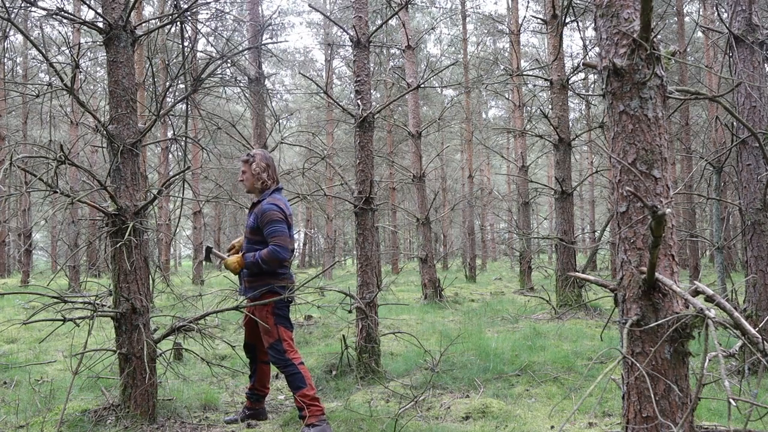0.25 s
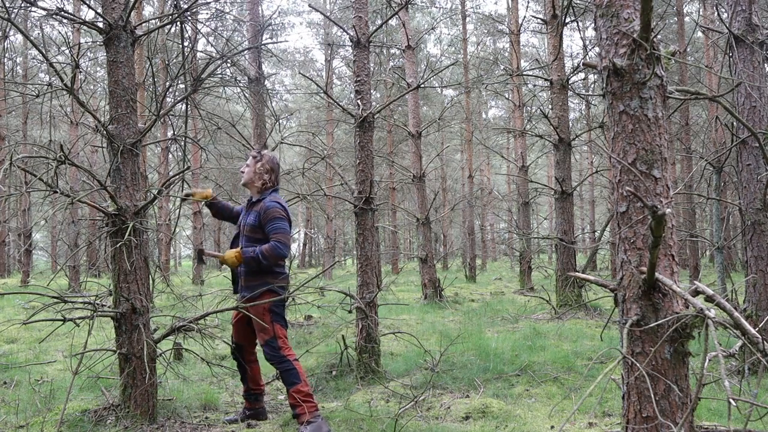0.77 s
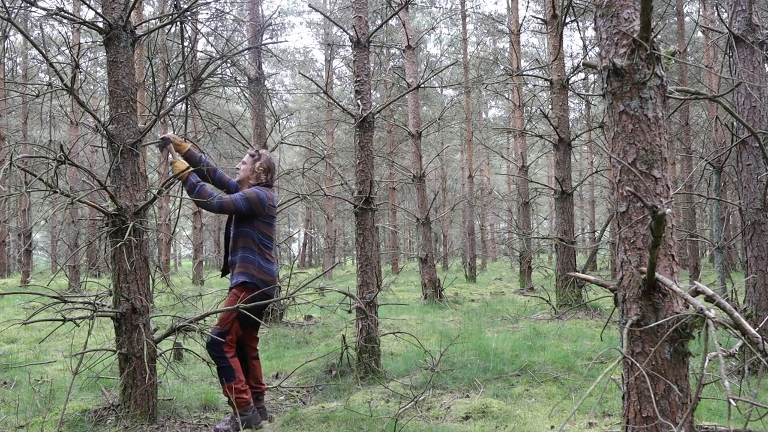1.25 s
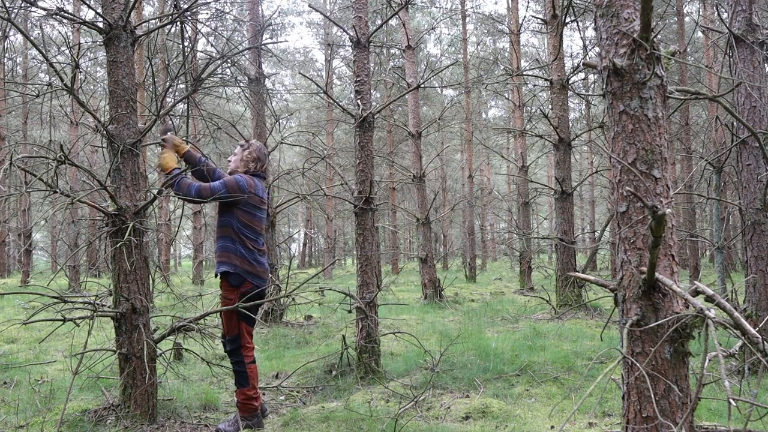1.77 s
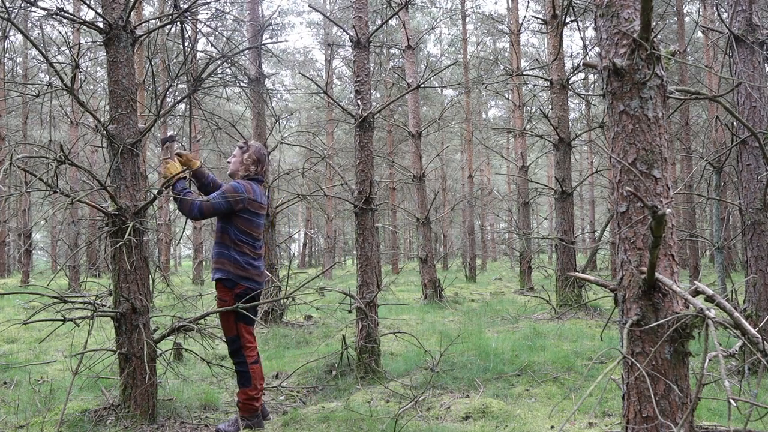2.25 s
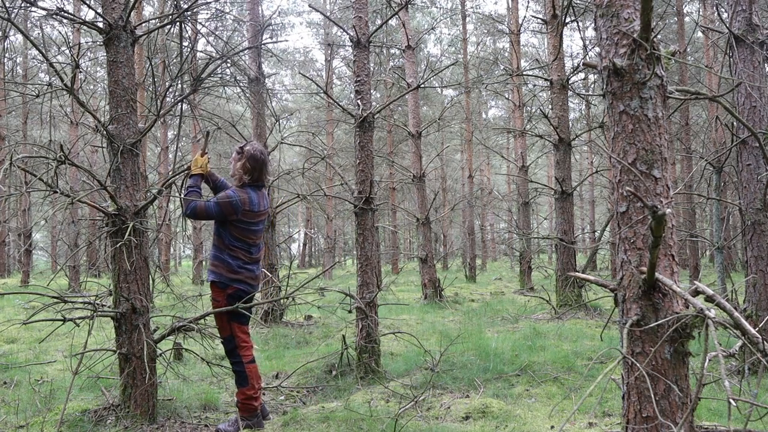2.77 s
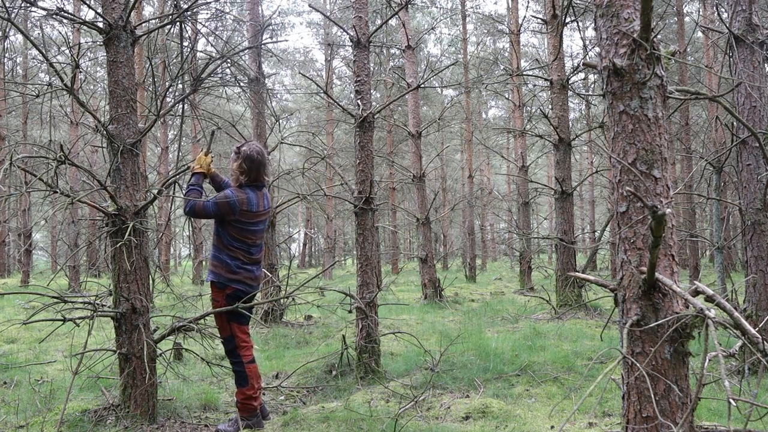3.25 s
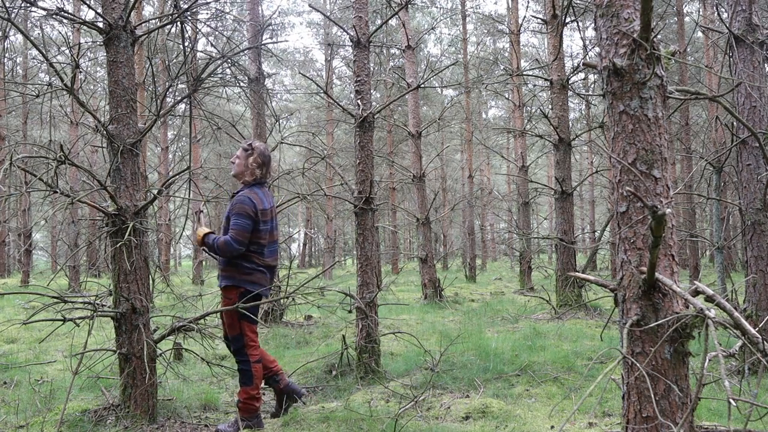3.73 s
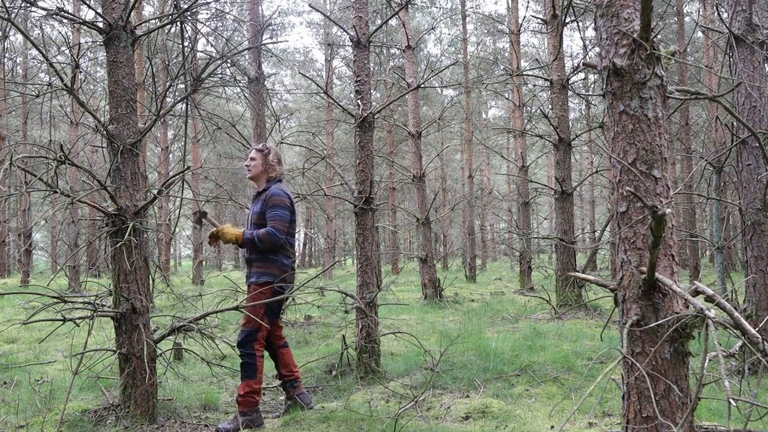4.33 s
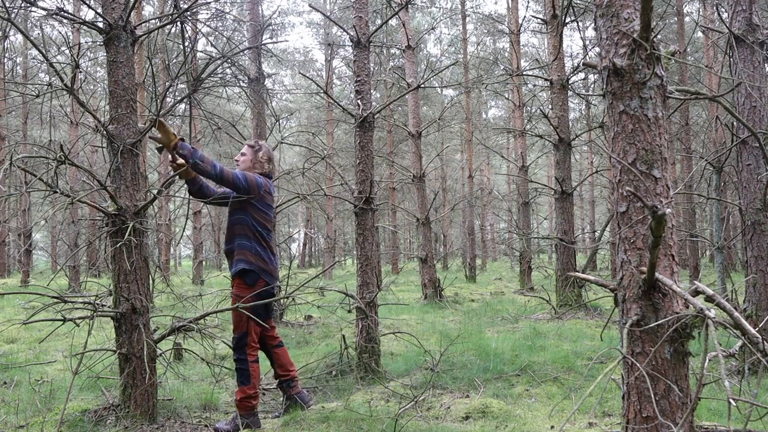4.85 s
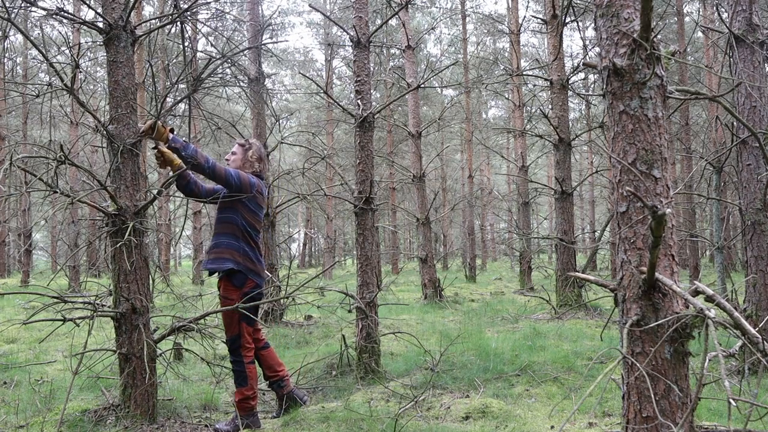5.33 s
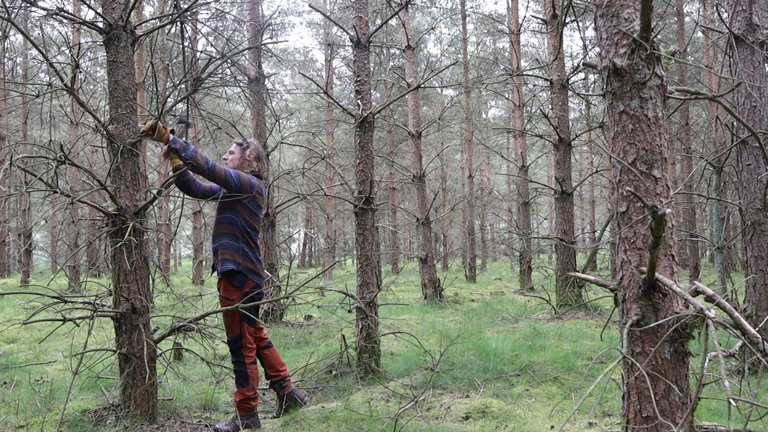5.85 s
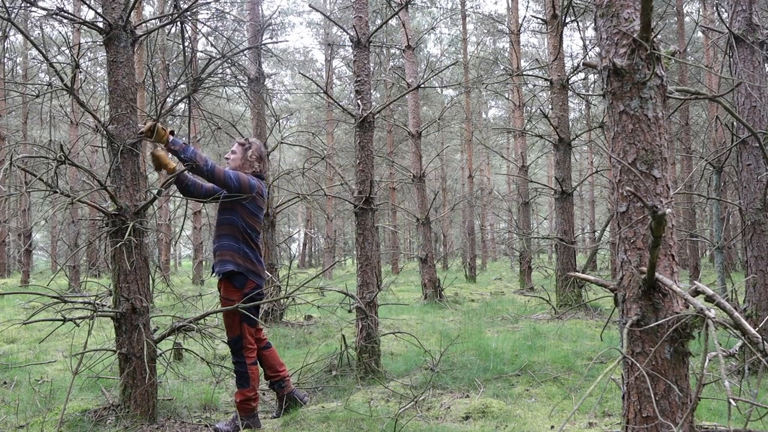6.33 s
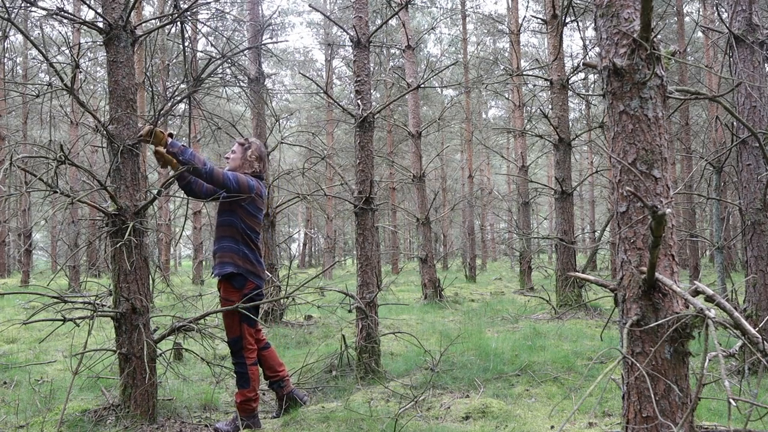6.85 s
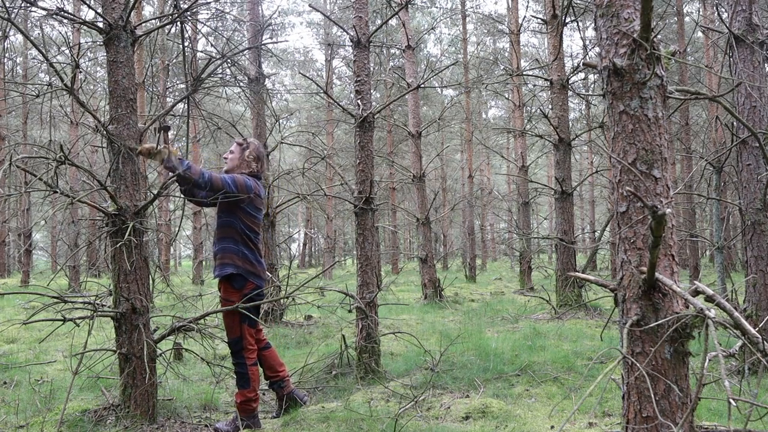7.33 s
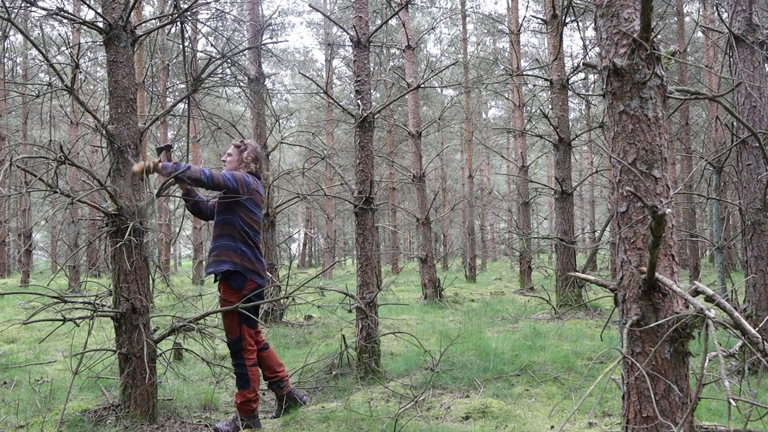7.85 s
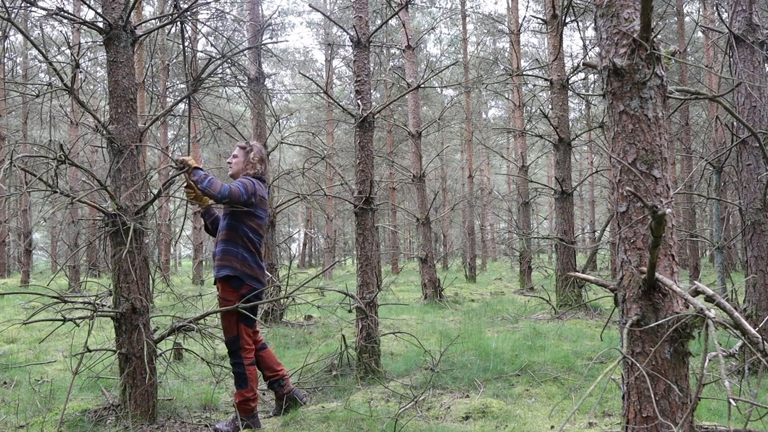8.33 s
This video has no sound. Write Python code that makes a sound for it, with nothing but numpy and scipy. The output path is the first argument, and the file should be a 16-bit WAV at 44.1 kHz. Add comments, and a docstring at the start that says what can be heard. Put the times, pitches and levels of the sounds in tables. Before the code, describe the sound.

Sharp brittle branch cracks, some with woody trunk knocks, amid clothing and bark rustle, low far-off traffic rumble and a few faint bird whistles.

```python
"""In a plantation, gloved hands snap dead pine twigs off a trunk: each crack is a burst of noise ringing dry wood.
Hard pulls jolt the trunk, whose decaying modes knock and boom; the trunks around answer each crack with a hiss.
Boots, sleeves and bark crackle as crowds of tiny damped clicks, and a small bird whistles in gliding sines.
A far road drones: filtered noise for tyres, harmonics for an engine that wavers and then sinks, one steadier hum.
Low wind rumbles, and the microphone clips the loudest cracks."""
import sys
import numpy as np
from scipy import signal
from scipy.fft import rfft, irfft, next_fast_len
from scipy.io import wavfile
from scipy.ndimage import uniform_filter1d, map_coordinates

SR = 44100
rng = np.random.default_rng(int(sys.argv[2]) if len(sys.argv) > 2 else 0)


def to_wav(s):
    """Save 16-bit WAV."""
    ch = np.atleast_2d(s).T  # columns
    pcm = np.round(np.clip(ch, -1, 1) * 32767)  # PCM
    wavfile.write(sys.argv[1], SR, pcm.astype(np.int16))


N = 378819  # length in samples

# Spectrum of the tyre roar: f/Hz, level/dB
ROAD_SPECTRUM = [(12, -31), (20, 0), (81, -1.5), (127, -4), (204, -9.5), (399, -5.5), (759, -2.5),
                 (1960, -19.5), (3250, -25.5), (4180, -26.5), (8180, -32.5), (14700, -28), (16000, -29)]
# Course of the tyre roar: t/s, level/dB
ROAD_COURSE = [(0, -48), (1.5, -47), (2.1, -48.5), (3.4, -47.5), (6.2, -50), (8.59, -49.5)]
# Engine: t/s, shaft f/Hz, level/dB, load/dB
ENGINE_COURSE = [(0, 26.3, -69, 17.5), (.6, 28, -68, 2.5), (1.4, 26, -61.5, 0), (2.2, 31.4, -62, -1),
                 (3, 25.3, -60.5, -15), (3.65, 31, -66, 1), (3.8, 29, -57.5, 8), (4.1, 28.7, -60.5, 13.5),
                 (5, 27, -59.5, 5), (5.5, 24.5, -64, 11.5), (6.3, 21.3, -55.5, 4), (7, 21.3, -59.5, -2),
                 (7.5, 22, -59.5, 4), (8.59, 18, -78, 11)]
# Orders of the shaft, one row for each multiple below: level/dB, share of the load that lifts it/1
ENGINE_ORDERS = [(-4, .2), (-0.4, 0.96), (.1, .05)]
SHAFT_MULTIPLES = 2, 3, 5
# A second, steadier drone: t/s, f/Hz, level/dB
HUM_COURSE = [(0, 122.1, -63), (.8, 117.6, -59), (1.6, 116.8, -56.5), (2.3, 114.9, -75), (3.2, 118.5, -73),
              (3.6, 121, -70)]
WIND_DB, GUST_DB = -65, 3  # mean level; depth of the gusts
# Whistles, one list for each call: t/s, f/Hz, level/dB
BIRD_CALLS = [
    [(.015, 4370, -70), (.055, 4430, -62), (.12, 4470, -66), (.26, 4460, -77)],
    [(4.185, 3750, -76), (4.22, 4150, -72), (4.26, 4420, -70), (4.32, 4530, -70), (4.41, 4510, -73)],
    [(6.53, 3400, -76), (6.56, 3600, -70), (6.585, 4100, -72), (6.61, 4200, -78)],
]

# Boots, sleeves and bark brushed: t of the peak/s, length/s, dull level/dB, crisp over dull level/dB
BRUSH_STROKES = [(.01, .03, -55, 1), (0.393, 0.037, -61, -1), (0.722, 0.15, -48, -0.5),
                 (0.924, 0.081, -54.5, -4), (1.066, 0.15, -65, 7), (1.292, 0.046, -43.5, -7),
                 (1.35, 0.057, -51.5, -8), (1.484, 0.13, -53.5, -5), (2.001, 0.22, -51.5, -24),
                 (2.246, 0.074, -56.5, -9), (2.465, 0.23, -58, -27), (2.66, 0.25, -57, -14),
                 (3.471, .15, -51, -10), (3.85, 0.19, -64, -15), (4.143, 0.074, -51.5, -4),
                 (4.5, 0.29, -59, -9), (4.827, 0.39, -65, -8), (5.13, 0.27, -64, -13),
                 (7.194, 0.22, -58.5, -13), (7.429, 0.1, -61, -3), (7.58, .3, -67, 4),
                 (7.84, 0.098, -49.5, -10), (7.96, .17, -46, -5), (8.165, 0.13, -50.5, -1.5),
                 (8.28, 0.23, -59.5, -16), (8.45, 0.21, -62.5, 1.5)]
EDGE_DB, RISE_SHARE = -7.5, 0.49  # level at either end of the length; share of the length spent rising
STIR_DB = -72.5, -69.5  # dull and crisp crackle between the brushes

# Pulls that shake the trunk: t/s, knock level/dB, boom level/dB, hollow ring level/dB
TRUNK_JOLTS = [(1.275, -35, -55, -40), (1.469, -29.5, -53, -33.5), (1.851, -31, -35, -26),
               (5.474, -31.5, -37.5, -36.5), (5.950, -26.5, -33, -29.5), (6.400, -27.5, -30, -33),
               (6.762, -36, -34, -53), (7.942, -48, -66, -37)]
# Modes of the knock: f/Hz, level/dB, time to the peak/s, t60/s
KNOCK_MODES = [(346, 2.5, 0.0052, 0.032), (214, -3.5, 0.0089, 0.075), (133.7, -2.5, 0.02, 0.03),
               (157.7, -11.5, 0.057, 0.048)]
# Modes of the boom: f/Hz, level/dB, time to the peak/s, t60/s
BOOM_MODES = [(68.7, -1, 0.095, 0.68), (54.6, -7.5, 0.092, 0.91)]
# Modes of the hollow ring: f/Hz, level/dB, time to the peak/s, t60/s
HOLLOW_MODES = [(636, -2, 0.01, 0.063), (451.5, -3.5, 0.0044, 0.082), (810, -1.5, 0.009, 0.017),
                (527, -5, 0.0029, 0.083), (268, -7.5, 0.0057, 0.1)]

# Decay of the sound scattered by the trunks: f/Hz, t60/s
FOREST_DECAY = [(500, 1), (2600, 0.33), (7000, 0.49), (15000, 0.092)]
ECHO_DB, ECHO_GROWS = -14.5, 0.061  # scattered over direct level for a 0 dB crack; dB more per dB of energy

# Breaks: t/s, energy level/dB, stub f/Hz, stub over 3 kHz ring level/dB, top over 3 kHz ring level/dB
TWIG_BREAKS = [(0.5467, -26.5, 1350, -5, -12), (0.6754, -18, 1630, 8, 14), (0.694, -17, 1320, -2, -1),
               (0.7074, -13.5, 1750, 10, 3), (0.7207, -13.5, 1280, 5, 9), (0.7366, -19, 1320, 0, 12),
               (0.8219, -20.5, 1160, 5, 5), (0.8778, -18, 2180, -11, 7), (0.8965, -20, 1590, 8, 3),
               (0.9518, -23, 1150, 2, -2), (1.2518, -16.5, 1380, -3, -6), (1.281, -14, 1490, -8, 10),
               (1.3447, -21, 1530, 9, 7), (1.47, -6.5, 2040, -4, -7.5), (1.5698, -7, 1430, 5, 0),
               (1.5906, -10, 1330, 1, -6), (1.7096, -4.5, 1870, 1, 1), (1.85, 4, 1640, -2, 2),
               (1.8502, 10.5, 2310, -7, -3.5), (1.868, -0.5, 1720, -5, -8), (2.2057, -22, 1710, -15, -2),
               (2.2736, -19, 1780, -9, -20), (2.41, -20, 1160, 6, 6), (2.7084, -21.5, 1237, -7, -11),
               (3.102, -26, 1150, -7, -22), (3.779, -30, 1370, -13, -19), (3.8327, -27, 1250, 10, 10),
               (3.9593, -17.5, 1840, -2, 0.5), (3.989, -26, 1910, 1, 6), (4.4215, -10, 1410, 5.5, 5),
               (4.4563, -19.5, 1200, 4, 21), (4.622, -25, 1140, 3, 6), (4.8656, -19, 1152, -3, -0.5),
               (5.1249, -16, 2280, -3.5, 2), (5.4748, -8, 1240, -7.5, -8.5), (5.9492, 7, 2202, -14.5, -12),
               (5.9506, 6.5, 1476, 5, 11), (6.3177, -29, 1260, 7, 6), (6.3983, 0, 1500, 4, 3.5),
               (6.4015, 3, 1310, 3.5, -3), (6.6852, -24.5, 1250, 6, -2), (6.7617, 9, 1434, -11.5, -9),
               (7.041, 0.5, 1430, -6.5, -7), (7.1203, -0.5, 1620, -2.5, 6.5), (7.1568, -21.5, 1360, -6, 7),
               (7.232, -3.5, 1820, -14, 8.5), (7.2491, -11, 1400, -6, 6.5), (7.53, -22.5, 1472, -13, -15),
               (7.5789, 2.5, 1997, -6, -0.5), (7.668, -18.5, 1550, -13, -10), (7.778, -23, 1700, -9, 2),
               (7.8021, -19, 1170, 1, -2), (7.8408, -11.5, 1460, 9, 10), (7.861, -13, 2220, -6, 0),
               (7.8674, -8.5, 1760, -15, -1), (7.9407, 1, 1460, -5, 1), (8.0195, -19, 1180, -4, -16),
               (8.1616, -17, 1250, 9, 8), (8.334, -14, 1487, 7, 13), (8.3421, -15, 1930, 4, 11),
               (8.3939, -18, 1740, -15, -3), (8.4765, -20, 1340, 5, 1)]
# Resonances of dry wood in the 3 kHz, 5 kHz and top groups: f/Hz, width/Hz (of each of two stages), level/dB
WOOD_GROUPS = [
    [(2410, 900, -5.5), (3113, 770, 6.5), (4110, 3500, -14)],
    [(5140, 2300, 0)],
    [(6700, 810, -16), (8930, 2800, 3.5), (10300, 2600, 4.5), (14500, 15000, 0)],
]
# Resonances of the piece left on the trunk: multiple of its pitch/1, width at STUB_LOSS_HZ/Hz, level/dB
STUB_MODES = [(1, 113, 6), (.7, 1350, -6), (1.35, 1060, -13)]
STUB_LOSS_HZ, STUB_LOSS_GROWS = 1420, 1.2  # widths grow as this power of the pitch over this reference in Hz
HOLD_S, HOLD_GROWS = .0017, .27  # tearing time in s at 0 dB energy; dB longer per dB stronger
DULL_HZ, DULL_FALLS = 12000, 0.15  # treble corner of a 0 dB crack; dB lower per dB of energy
FIVE_DB, FIVE_FOLLOWS, FIVE_GROWS = -3.5, .4, 0.28  # 5 kHz over 3 kHz ring; dB per dB of top, of energy
SPLINTER_S, SPLINTER_DB = .003, 5  # a break this soon after another is a thin splinter: stronger 5 kHz ring

# Microphone response: f/Hz, level/dB
MIC_RESPONSE = [(1000, 0.5), (3500, 0.5), (4250, -4.5), (5400, 0), (6300, -4.5), (7500, 0.5), (15000, -6.5)]
CLIP, KNEE = .54, 8  # full swing of the input; hardness of its corner
TOP_HZ = 16000  # upper band limit


def amp(db):
    """Level: an amplitude ratio is ten to the power dB/20."""
    return 10 ** (np.asarray(db) / 20)


def unit(x):
    """Normalization: a signal divided by its rms has rms 1."""
    return x / np.sqrt(np.mean(x ** 2) + 1e-20)


def along(points, hz):
    """Interpolation of (f, value) points on a logarithmic frequency axis."""
    f, v = np.transpose(points)
    return np.interp(np.log(hz + 1), np.log(f + 1), v)


def curves(rows):
    """Linear interpolation in time: one value per sample for each column after t."""
    s, *cols = np.transpose(rows)
    return [np.interp(np.arange(N) / SR, s, c) for c in cols]


def wobble(count):
    """Random fluctuation: a smooth curve, stepped every 64 samples, through random knots."""
    knots = rng.standard_normal(count + 1)
    places = np.linspace(0, count, N // 64 + 1)
    return map_coordinates(knots, [places]).repeat(64)[:N]


def filtered(x, response):
    """Linear filtering: the spectrum is multiplied by a response of frequency."""
    m = next_fast_len(len(x) + 8192)  # padded against wrap-around
    return irfft(rfft(x, m) * response(np.fft.rfftfreq(m, 1 / SR)), m)[:len(x)]


def resonance(f, hz, width_hz):
    """Simple resonator: a causal band-pass response with peak gain 1."""
    return 1j * f * width_hz / (hz * hz - f * f + 1j * f * width_hz)


def tone(rows):
    """Frequency modulation: a sine's phase integrates its frequency; it is silent outside its rows."""
    hz, db = curves(rows)
    t = np.arange(N) / SR
    sounding = (t > rows[0][0]) * (t < rows[-1][0])
    return amp(db) * np.sqrt(2) * np.sin(2 * np.pi * np.cumsum(hz) / SR) * sounding


def add(track, s, sound):
    """Superposition: a sound is added to the track from s seconds on."""
    part = track[round(s * SR):][:len(sound)]
    part += sound[:len(part)]


def wind():
    """Turbulence noise: low resonant noise whose level varies in gusts."""
    rumble = unit(filtered(rng.standard_normal(N), lambda f: resonance(f, 30.3, 25) ** 2))
    return amp(WIND_DB + GUST_DB * wobble(count=25)) * rumble


def tyre_roar():
    """Broadband rolling noise, its spectrum thinned by distance."""
    level_db, = curves(ROAD_COURSE)
    roar = unit(filtered(rng.standard_normal(N), lambda f: amp(along(ROAD_SPECTRUM, f))))
    return amp(level_db + 0.95 * wobble(count=30)) * roar


def engine():
    """Periodic excitation: orders at multiples of the shaft rate, wavering in level on the way."""
    shaft_hz, level_db, load_db = curves(ENGINE_COURSE)
    turn = 2 * np.pi * np.cumsum(shaft_hz) / SR
    out = np.zeros(N)
    for k, (order_db, load_share) in zip(SHAFT_MULTIPLES, ENGINE_ORDERS):
        gain = amp(level_db + order_db + load_share * load_db + wobble(count=30))
        out += gain * np.sqrt(2) * np.sin(k * turn)
    return out


def hum():
    """Amplitude modulation: one drone of slowly gliding pitch whose level wavers."""
    return tone(HUM_COURSE) * amp(2.5 * wobble(count=30))


def bird():
    """Multipath fading: thin far whistles flicker in level, blurred by many paths through the trees."""
    blur = 1 + .3 * wobble(count=1200)
    return sum(tone(call) for call in BIRD_CALLS) * amp(1.2 * wobble(count=350)) * blur


def crackle(hz, spread, count, spiky_db, hiss):
    """Granular noise: tiny damped clicks of scattered pitch and size over a fine hiss, rms 1."""
    draw = rng.random((count, 2))  # place and size of each click
    pitch = np.clip(hz * np.exp(spread * rng.standard_normal((count, 1))), 300, 15000)
    t = np.arange(64) / SR
    size = amp(-spiky_db * np.log(draw[:, 1:] + 0.0048))  # few large, many small
    grains = size * np.sin(2 * np.pi * pitch * t) * np.exp(-t * pitch / 2.5)
    at = (draw[:, :1] * N).astype(int) + np.arange(len(t))
    clicks = unit(np.bincount(at.ravel(), grains.ravel(), N + len(t))[:N])
    fine = unit(filtered(rng.standard_normal(N), lambda f: resonance(f, hz, 3.2 * spread * hz)))
    return unit(clicks + hiss * fine)


def rustle():
    """Frictional noise of needles, bark and cloth: brushes swell a crisp and a dull crackle that clump."""
    t = np.arange(0, N + 64, 64) / SR  # coarse time for the envelopes
    s, length, db, crisp_db = np.transpose(BRUSH_STROKES)[..., None]
    span = length * np.where(t < s, RISE_SHARE, 1 - RISE_SHARE)
    swell = amp(db + EDGE_DB * (np.abs(t - s) / span) ** 2.07)
    dull_stir, crisp_stir = amp(STIR_DB)
    now = np.arange(N) / SR
    dull_gain = np.interp(now, t, dull_stir + np.sum(swell, axis=0))
    crisp_gain = np.interp(now, t, crisp_stir + np.sum(swell * amp(crisp_db), axis=0))
    clumps_db = 2.5 * wobble(count=500)
    crisp = crackle(8200, 0.51, count=9000, spiky_db=5.5, hiss=0.73)
    dull = crackle(2680, 0.45, count=5000, spiky_db=3.5, hiss=0.82)
    return amp(clumps_db) * (crisp_gain * crisp + dull_gain * dull)


def trunk():
    """Dispersion: bending waves are slow in the bass, so the knock slides down and the boom swells late, beating."""
    out, t = np.zeros(N), np.arange(SR * 3 // 4) / SR
    for s, *layers_db in TRUNK_JOLTS:
        for modes, db in zip((KNOCK_MODES, BOOM_MODES, HOLLOW_MODES), layers_db):
            for hz, level_db, peak, t60 in modes:
                swell = np.sin(np.pi / 2 * np.clip(t / peak, 0, 1)) ** 8.1
                decay_db = -60 * np.maximum(t - peak, 0) / t60
                fade = amp(level_db + rng.normal(0, 0.5) + decay_db)
                add(out, s, amp(db) * swell * fade * np.sin(2 * np.pi * hz * t))
    return out


def forest(crack, wet_db):
    """Multiple scattering: trunks at all distances return a dying hiss; many paths blur the crack's spectrum."""
    hz, t = np.fft.rfftfreq(256, 1 / SR), np.arange(120) * 128 / SR  # bins and frames
    power = uniform_filter1d(np.abs(rfft(crack)) ** 2, size=30)[::8]
    shape = len(hz), len(t)
    z = rng.standard_normal(shape) + 1j * rng.standard_normal(shape)
    z *= np.sqrt(np.abs(power))[:, None] * amp(-60 * t / along(FOREST_DECAY, hz)[:, None])
    z *= amp(2.0 * rng.standard_normal(len(t)))  # single trunks stand out of the hiss
    tail = signal.istft(z, SR, nperseg=256)[1]
    tail *= np.clip(np.arange(len(tail)) / SR / 0.002, 0, 1)  # fades in over 2 ms
    return amp(wet_db) * tail * np.linalg.norm(crack) / np.linalg.norm(tail)


def body(f, modes):
    """Modal sum: two-stage resonances of (f, width, level) with alternating sign."""
    return sum(amp(db) * resonance(f, hz, width) ** 2 * (-1) ** k for k, (hz, width, db) in enumerate(modes))


def tearing(t, db):
    """Fracture: fibres part in a burst of uneven ticks round one main crack; thick wood tears for longer."""
    hold = HOLD_S * amp(HOLD_GROWS * db)
    rise = np.clip(t / (0.72 * hold), 0, 1)
    release = amp(-60 * np.maximum(t - hold, 0) / (8.6 * hold))
    ticks = rise * release * rng.standard_normal(len(t)) * amp(4.7 * rng.standard_normal(len(t)))
    ticks[round(.45 * hold * SR)] += 1.16 * np.linalg.norm(ticks)  # the main crack
    return ticks


def snaps():
    """Forced resonance: tearing drives stub and dry wood; stronger cracks lose treble, high stubs ring shorter."""
    out, t = np.zeros(N), np.arange(2048) / SR
    f = np.fft.rfftfreq(len(t), 1 / SR)
    groups = [body(f, modes) for modes in WOOD_GROUPS]
    gaps = np.diff(np.transpose(TWIG_BREAKS)[0], prepend=0)
    for gap, (s, db, stub_hz, stub_db, top_db) in zip(gaps, TWIG_BREAKS):
        widen = (stub_hz / STUB_LOSS_HZ) ** STUB_LOSS_GROWS
        stub = body(f, [(stub_hz * ratio, width * widen, level) for ratio, width, level in STUB_MODES])
        dull = 1 / (1 + 1j * f / (DULL_HZ * amp(-DULL_FALLS * db))) ** 2
        rings = irfft(rfft(tearing(t, db)) * dull * np.array([stub, *groups]))
        rings /= np.linalg.norm(rings, axis=1, keepdims=True)
        five_db = FIVE_DB + FIVE_FOLLOWS * top_db + FIVE_GROWS * db + SPLINTER_DB * (gap < SPLINTER_S)
        mix = amp([stub_db, 0, five_db, top_db])
        crack = amp(db) * mix / np.linalg.norm(mix) @ rings
        add(out, s, crack)
        add(out, s, forest(crack, ECHO_DB + ECHO_GROWS * db))
    return out


def scene():
    """Superposition of all sources at one microphone."""
    road = tyre_roar() + engine() + hum()
    return (wind() + road + bird() + rustle() + trunk() + snaps())[None]


def record(dry):
    """Transduction: the treble has two fixed notches, the input saturates, and the band limit cuts the top."""
    x = filtered(dry[0], lambda f: amp(along(MIC_RESPONSE, f)))
    x = x / (1 + np.abs(x / CLIP) ** KNEE) ** (1 / KNEE)
    return filtered(x, lambda f: np.clip((TOP_HZ - f) / 300, 0, 1))[None]


dry = scene()
out = record(dry)
to_wav(out)
```